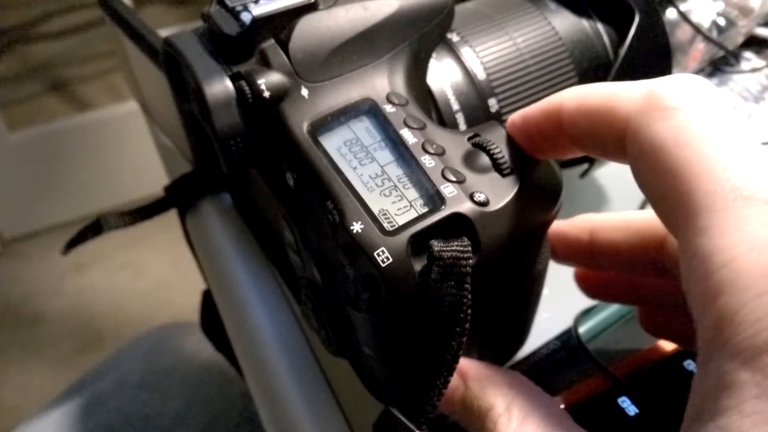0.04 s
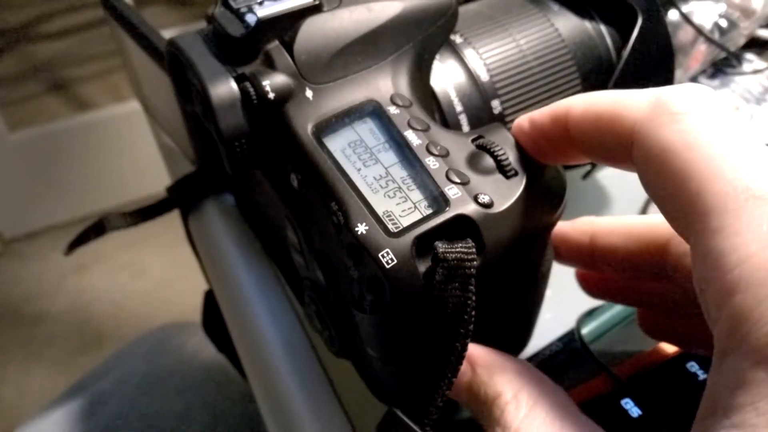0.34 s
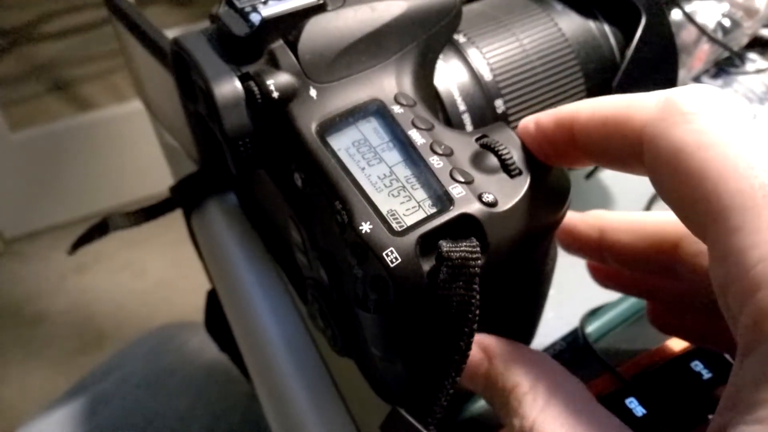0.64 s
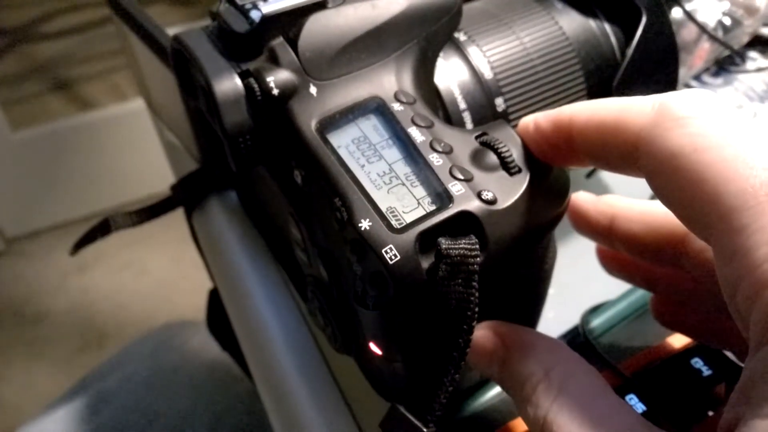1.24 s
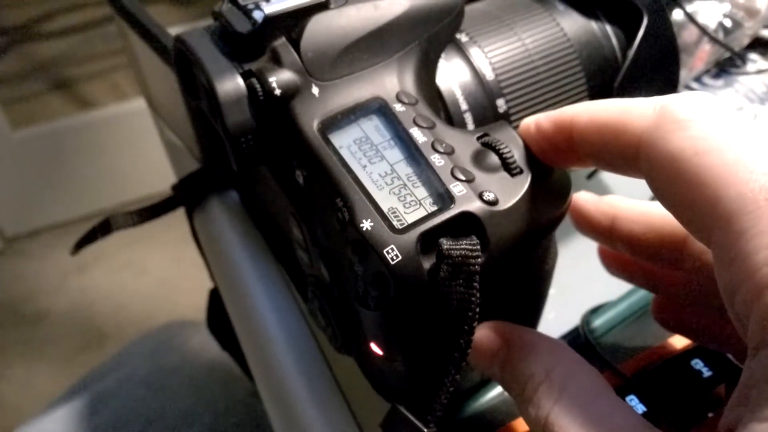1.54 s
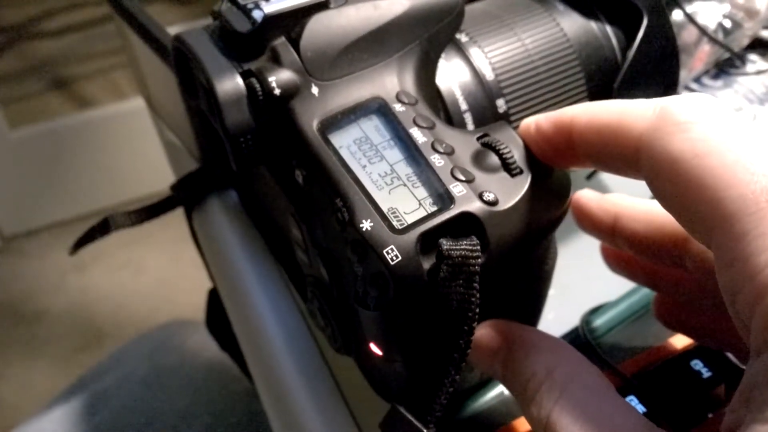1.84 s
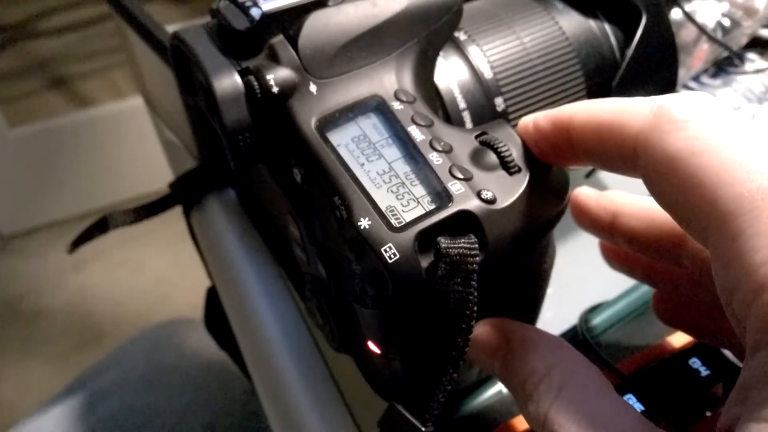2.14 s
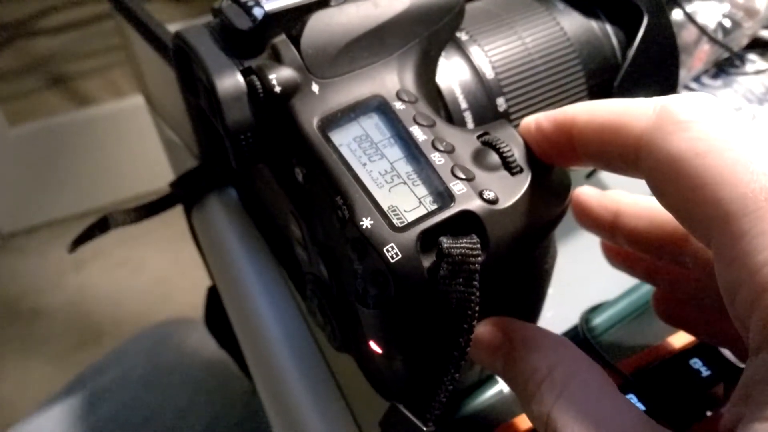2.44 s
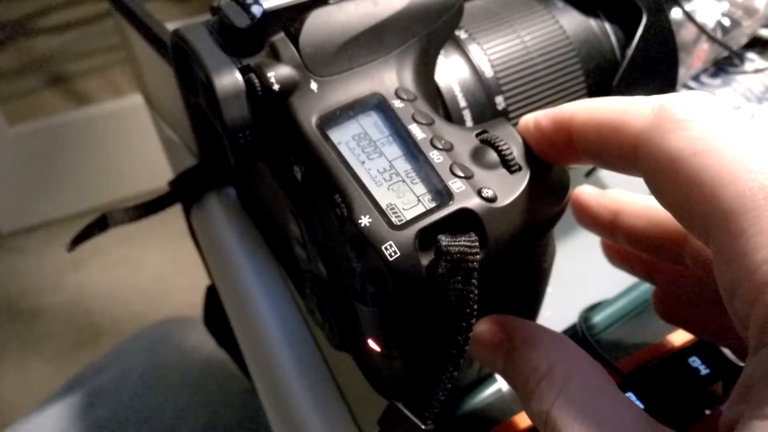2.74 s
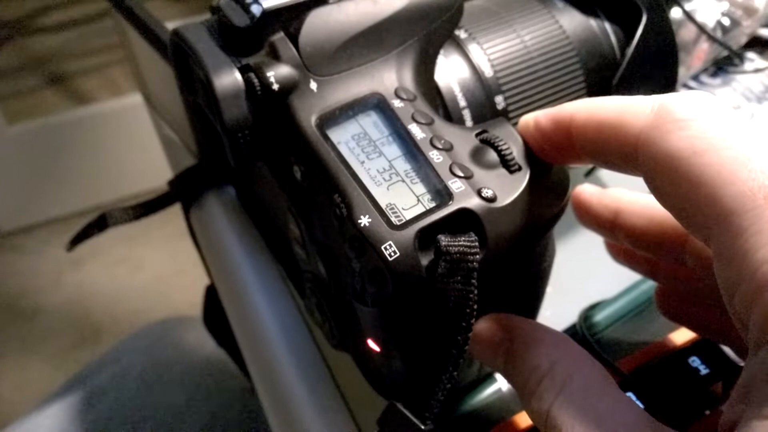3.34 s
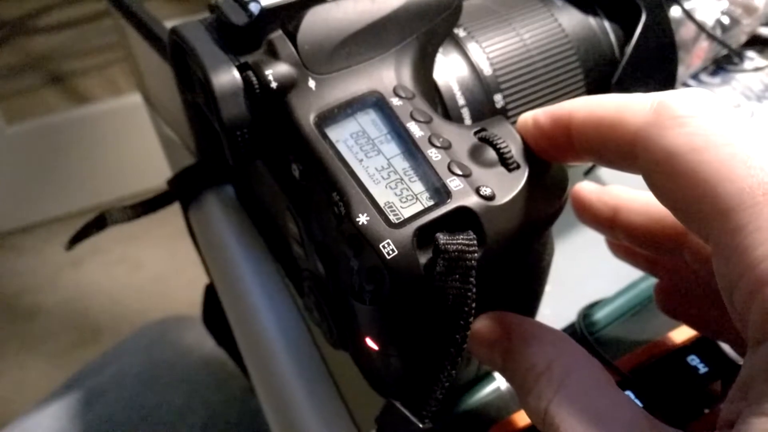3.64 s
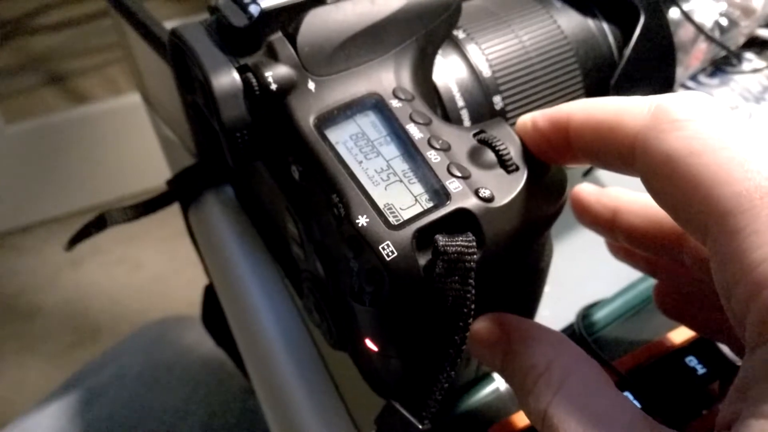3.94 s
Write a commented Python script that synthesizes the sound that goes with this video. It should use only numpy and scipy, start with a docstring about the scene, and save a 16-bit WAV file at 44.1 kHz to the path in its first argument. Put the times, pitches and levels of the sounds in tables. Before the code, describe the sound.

A camera shutter fires close by in a quiet room. After a soft button tick, crisp double clacks repeat about five times a second, each with a brief motor whirr and gear rattle, over a faint low hum.

```python
"""A quiet room, close to a reflex camera on a stand: a soft button tick, then a burst of seventeen frames.
In each frame the release ticks, the mirror slaps up, the shutter closes and the mirror seats:
four chattering blows that ring the camera body. The motor whirrs and its gear teeth rattle as it winds on.
Underneath, the body thuds with the recoil and the shaken stand hums low."""
import sys
import numpy as np
from scipy import signal
from scipy.fft import rfft, irfft
from scipy.io import wavfile
from scipy.ndimage import uniform_filter1d

SR = 44100
rng = np.random.default_rng(int(sys.argv[2]) if len(sys.argv) > 2 else 0)


def inscribe(sig):
    """Save sig as 16-bit PCM at rate SR to the path in sys.argv[1].

    A 1-D sig is mono; a 2-D sig holds one channel per row.
    Samples are clipped to [-1, 1] before scaling.
    """
    pcm = np.round(np.clip(np.atleast_2d(sig).T, -1, 1) * 32767)
    wavfile.write(sys.argv[1], SR, pcm.astype(np.int16))


N = 176400

# the frames of the burst: slap_s, release_tick_db
FRAMES = [(0.8185, -3.2), (1.006, 0.4), (1.1949, 0), (1.3838, 0.1), (1.5727, -0.2), (1.762, -0.1),
          (1.9504, 0.2), (2.1392, 0.6), (2.3282, -1), (2.5169, 0.9), (2.7057, 0.2), (2.8947, -0.7),
          (3.0835, 0.3), (3.2724, 1), (3.4378, -0.1), (3.6273, 0), (3.8157, -0.6)]
# how long the room rings: frequency_hz, t60_s
ROOM_DECAY = [(150, .36), (800, .36), (2500, .33), (6000, .33), (14000, .33)]
LEAD_S = .005  # space for a blow to rise before it lands


def amp(db):
    """Decibels to gain."""
    return 10 ** (np.asarray(db) / 20)


def unit(x):
    """Scales to rms 1."""
    return x / np.sqrt(np.mean(x ** 2) + 1e-20)


def curve_at(points, hz):
    """Reads a curve on a log-frequency axis."""
    point_hz, value = np.transpose(points)
    return np.interp(np.log(hz + 1), np.log(point_hz + 1), value)


def add(mix, start_s, sound):
    """Mixes a stereo sound in at a time."""
    span = mix[:, round(start_s * SR):][:, :sound.shape[1]]
    span += sound[:, :span.shape[1]]


def pan(db):
    """Left and right gains for a left-minus-right level."""
    return amp(np.array([[.5], [-.5]]) * db)


def stereo_image(x, colour=None):
    """Blends two unrelated signals into narrow bass and wide treble, with optional EQ; rms 1."""
    # likeness of left and right: frequency_hz, correlation
    likeness = [(100, .85), (700, .85), (1500, .8), (2800, .55), (5000, .28), (12000, .12)]
    hz, spectra = np.fft.rfftfreq(x.shape[1], 1 / SR), rfft(x)
    correlation = curve_at(likeness, hz)
    mid, side = spectra[0] * np.sqrt(1 + correlation), spectra[1] * np.sqrt(1 - correlation)
    eq = 1 if colour is None else amp(curve_at(colour, hz))
    return unit(irfft(np.array([mid + side, mid - side]) * eq, x.shape[1]))


def noise(size, colour=None):
    """Stereo noise of rms 1."""
    return stereo_image(rng.standard_normal((2, size)), colour)


def reflections(t60, size):
    """A diffuse tail, each band dying at its own speed; energy 1."""
    hz, t, bands = signal.stft(noise(size), SR, nperseg=256)
    decay = amp(-60 * t / curve_at(t60, hz)[:, None])
    tail = signal.istft(bands * decay, SR, nperseg=256)[1]
    tail *= np.clip(np.arange(tail.shape[1]) / SR / .002 - 1, 0, 1)  # fades in from 2 to 4 ms
    return unit(tail) / np.sqrt(tail.shape[1])


def blend(tails):
    """A random mixture of reflection tails, energy about 1."""
    weights = unit(rng.standard_normal(len(tails)))
    return np.tensordot(weights, tails, 1) / np.sqrt(len(tails))


def room_tone():
    """A faint, steady bed of mostly low noise."""
    # colour of the quiet room: frequency_hz, level_db
    colour = [(12, -15), (22, -2), (60, 0), (86, -9), (120, -6), (150, -11), (210, -7), (290, -22),
              (400, -18), (600, -27), (1000, -32), (1700, -35), (2150, -30), (2700, -35), (4300, -38),
              (6200, -42), (8000, -46), (16000, -53)]
    return amp(-58) * noise(N, colour)


def stand_hum(drift_hz=1.3):
    """Two low, slightly wavering modes of the stand ring on through the burst, over a loose rumble."""
    # swell of the lower mode: time_s, level_db
    sway = [(0.7, -70), (0.74, -62), (2.24, -48), (2.3, -62), (2.38, -41), (2.45, -53), (2.8, -43),
            (3.1, -57), (3.19, -42), (3.29, -56), (3.39, -48), (3.98, -60), (4.0, -65)]
    # swell of the upper mode: time_s, level_db
    hum = [(0.7, -71), (0.86, -49), (0.9, -56), (1.3, -53), (1.46, -36), (1.82, -49), (2.37, -44),
           (2.42, -53), (2.62, -43), (2.68, -50), (2.75, -41), (3.05, -54), (3.19, -42), (3.25, -49),
           (3.48, -45), (3.51, -52), (3.93, -45), (4.0, -48)]
    # loose shaking of the stand: frequency_hz, level_db
    rumble = [(20, -7), (55, -2), (90, -2), (130, -2), (200, -10), (300, -28), (1000, -60)]
    t, modes = np.arange(N) / SR, 0
    for swell, pitch_hz, trim_db in ((sway, 54, -1.5), (hum, 119.5, -1)):
        level = amp(trim_db + np.interp(t, *np.transpose(swell)))
        drift = unit(uniform_filter1d(rng.standard_normal(N), size=5000))
        phase = 2 * np.pi * np.cumsum(pitch_hz + drift_hz * drift) / SR
        modes += level * np.sqrt(2) * np.sin(phase)
    fade_in = np.clip((t - FRAMES[0][0]) / .02, 0, 1)
    return pan(-3.5) * (modes + amp(-54) * noise(N, rumble)) * fade_in


def button_tick(start_s=.459, rise_s=.001, decay_s=.004, size=4096):
    """A soft tick as the finger takes up the release button."""
    # colour of the tick: frequency_hz, level_db
    colour = [(100, -15), (400, -12), (800, 0), (2000, 0), (3000, -9), (6000, -18), (9000, -31),
              (14000, -42)]
    out, t = np.zeros((2, N)), np.arange(size) / SR
    tick = noise(size, colour) * np.minimum(t / rise_s, 1) * np.exp(-t / decay_s)
    add(out, start_s, amp(-31) * unit(tick) / np.sqrt(size))
    return out


def recoil(peak_s=.052, half_length_s=.06, size=8192):
    """The moving mirror and gears shake the body with much the same thud in each frame."""
    # colour of the thud: frequency_hz, level_db
    colour = [(25, -8), (40, -11), (60, -8), (85, -1), (120, -5), (150, -3), (180, -8), (207, 4), (235, -6),
              (290, -17), (380, -16), (600, -34)]
    out, usual = np.zeros((2, N)), noise(size, colour)
    t = np.arange(size) / SR - .015  # time after the slap
    envelope = np.exp(-((t - peak_s) / half_length_s) ** 4)
    for slap_s, _ in FRAMES:
        add(out, slap_s + t[0], envelope * unit(usual + .9 * noise(size, colour)))
    return amp(-41.5) * pan(-2.5) * out


def body_ring(part, size=4096):
    """How one part of the camera rings through the case when struck; energy 1."""
    # broad tone, by part: frequency_hz, level_db
    colour = {"release": [(60, -16), (200, -10.3), (400, -18.3), (700, -8.1), (1200, -6.4), (2500, 0.0),
              (4500, -4.1), (7000, -6.6), (11000, -4.6), (15500, -14.1)], "slap": [(60, -13), (200, -7.5),
              (400, -11.3), (700, -8.8), (1200, -3.8), (2500, -5.9), (4500, -5.1), (7000, 0.0),
              (11000, -9.5), (15500, -8.1)], "shutter": [(60, -17), (200, -10.7), (400, -20.3),
              (700, -18.9), (1200, -9.6), (2500, 0.0), (4500, -9.3), (7000, -8.7), (11000, -9.0),
              (15500, -15.2)], "seat": [(60, -9), (200, -2.8), (400, -12.6), (700, -5.2), (1200, -7.6),
              (2500, 0.0), (4500, -6.4), (7000, -3.3), (11000, -4.3), (15500, -7.4)], "motor": [(60, -6),
              (200, 0.0), (400, -9.9), (700, -12.4), (1200, -5.0), (2500, -1.0), (4500, -6.8), (7000, -9.5),
              (11000, -11.0), (15500, -16.2)]}
    # resonances, by part: pitch_hz, width_hz, height_db
    part_modes = {"release": [(1479, 272, 8.7), (2197, 60, 5.2), (3248, 60, 1.0), (3924, 499, 8.6),
                  (5726, 622, 11.7), (6140, 221, 6.8), (7019, 662, 7.7), (8637, 472, 9.7)],
                  "slap": [(749, 227, 12.1), (1582, 326, 12.8), (2188, 374, 8.0), (2542, 315, 16.0),
                  (2822, 386, 11.2), (3414, 465, 9.8), (3997, 295, 12.2), (5286, 105, 6.2),
                  (6335, 661, 5.6), (7807, 94, 7.2), (8699, 305, 7.5), (10615, 938, 8.2),
                  (12118, 1081, 7.9), (13850, 218, 8.4)], "shutter": [(389, 94, 16.0), (561, 145, 12.9),
                  (796, 271, 16.0), (1566, 145, 9.4), (2189, 83, 4.8), (3011, 312, 11.0), (5446, 379, 6.9),
                  (6278, 678, 6.0), (7395, 134, 5.9), (8160, 421, 8.6), (9083, 849, 7.7),
                  (12129, 1060, 5.8), (14291, 860, 8.7)], "seat": [(1575, 186, 6.3), (2534, 60, 1.0),
                  (5892, 530, 3.5), (11994, 537, 8.3)], "motor": [(480, 119, 11.1), (787, 275, 9.6),
                  (1545, 60, 4.5), (2304, 388, 5.3), (3172, 433, 4.0), (11932, 1039, 4.0)]}
    # longer rings of the case, under every part: pitch_hz, width_hz, height_db
    case_modes = [(684, 26, 7), (1468, 40, 3.5), (1541, 30, 3), (3950, 200, 2.5), (5718, 80, 3)]
    # a small body radiates little bass: frequency_hz, gain_db
    bass_loss = [(30, -14), (100, -7), (290, -3), (400, -1), (500, -2.5), (650, 0)]
    # stereo placement, by part: frequency_hz, left_minus_right_db
    placement = {"release": [(300, -1.4), (670, 4.0), (1414, 5.1), (2569, 0.3), (4062, -1.5), (6324, -3.7),
                 (11135, -3.8)], "slap": [(300, -0.2), (670, 3.6), (1414, -1.2), (2569, 3.4), (4062, -3.8),
                 (6324, -1.7), (11135, -3.0)], "shutter": [(300, -2.6), (670, 4.7), (1414, 3.8),
                 (2569, -1.3), (4062, -2.1), (6324, 0.9), (11135, 0.1)], "seat": [(600, 3), (2500, 0),
                 (12000, -2)], "motor": [(200, -2), (600, 4), (2500, 0), (12000, -1.5)]}
    hz = abs(np.fft.fftfreq(size, 1 / SR))
    peaks_db = sum(height_db / (1 + (2 * (hz - pitch_hz) / width_hz) ** 2)
                   for pitch_hz, width_hz, height_db in part_modes[part] + case_modes)
    tone_db = curve_at(colour[part], hz) + curve_at(bass_loss, hz) + peaks_db
    log_gain = np.log(amp(tone_db) * pan(curve_at(placement[part], hz)))
    spectrum = np.exp(np.conj(signal.hilbert(log_gain)))  # minimum phase: the ring follows the hit
    ring = np.fft.ifft(spectrum).real[:, :size // 2]
    return unit(ring) / np.sqrt(size // 2)


def each_frame(envelope):
    """Repeats an envelope, given against the time after the slap, for every frame."""
    t = np.arange(N) / SR
    return sum(envelope(t - slap_s) for slap_s, _ in FRAMES)


def motor_wind(teeth_per_s=4000, spread_db=2.5, hiss=.55, whirr_hz=2400, whirr_width_hz=1000):
    """Gear teeth rattle as the shutter is cocked again, over the whirr of the motor."""
    # effort of the gear train through one cycle: after_slap_s, level_db
    wind = [(-.015, -62), (-.0125, -39), (-.004, -39), (.016, -45), (.023, -36), (.034, -46), (.039, -35),
            (.05, -39), (.062, -35), (.0675, -26.5), (.072, -32), (.085, -28.5), (.092, -33), (.098, -28),
            (.106, -34), (.127, -39), (.139, -56)]
    teeth = rng.random(N) < teeth_per_s / SR
    strength = amp(spread_db * np.minimum(rng.exponential(1, N), 3))
    clicks = unit(teeth * strength * rng.standard_normal((2, N)))
    rattle = stereo_image(clicks + hiss * rng.standard_normal((2, N)))
    after_slap_s, level_db = np.transpose(wind)
    effort = each_frame(lambda t: np.interp(t, after_slap_s, amp(level_db), left=0, right=0))
    gears = signal.fftconvolve(rattle * effort, body_ring("motor"), axes=1)[:, :N]
    hz = np.fft.rfftfreq(N, 1 / SR)
    band = 1 / (1 + (2 * (hz - whirr_hz) / whirr_width_hz) ** 2)
    whirr = unit(irfft(rfft(noise(N)) * band, N))
    spin = each_frame(lambda t: np.exp(-((t - .108) / .022) ** 2))  # spins up, then coasts
    direct = gears + amp(-42) * whirr * spin
    room = signal.fftconvolve(direct, reflections(ROOM_DECAY, size=16384), axes=1)[:, :N]
    return direct + amp(-10) * room


def contact(rise_s, decay_s, chatter_s=.0012, size=1024, passes=6):
    """Two parts slide together, chatter briefly and come to rest; near-even spectrum, energy 1."""
    t = np.arange(size) / SR - LEAD_S
    envelope = np.exp(np.minimum(t, 0) / rise_s - np.maximum(t - chatter_s, 0) / decay_s)
    click = noise(size) * envelope
    for _ in range(passes):  # flatten the spectrum, then restore the envelope
        white = irfft(np.exp(1j * np.angle(rfft(click))))
        local_rms = np.sqrt(abs(uniform_filter1d(white ** 2, size=40)) + 1e-12)
        click = envelope * np.tanh(white / local_rms)
    spectrum = rfft(click)
    click = irfft(spectrum / (abs(spectrum) + 1e-9) ** .7)  # partial whitening
    return unit(click) / np.sqrt(size)


def shutter_blows(room_db=-15, tail_count=8):
    """Release, mirror slap, shutter and mirror seat strike the body, nearly alike in every frame."""
    # the blows, by part: after_slap_s, energy_db, rise_s, decay_s, near_reflections_db, variation (0-1)
    blows = { "release": (-.0125, 4, .00012, .0018, -8.5, .4), "slap": (.0002, 11, .0005, .001, -13, .2),
             "shutter": (.0423, 9.3, .0003, .0017, -12.5, .35), "seat": (.0756, 2.4, .002, .0014, -8.5, .5),
             }
    # how long the near reflections last: frequency_hz, t60_s
    near_decay = [(200, .07), (2500, .06), (12000, .045)]
    out = np.zeros((2, N))
    room_tails = np.array([reflections(ROOM_DECAY, size=12288) for _ in range(tail_count)])
    near_tails = np.array([reflections(near_decay, size=4096) for _ in range(tail_count)])
    for part, (after_slap_s, energy_db, rise_s, decay_s, near_db, variation) in blows.items():
        click, near, room = contact(rise_s, decay_s), blend(near_tails), blend(room_tails)
        same = np.sqrt(1 - variation ** 2)  # weight of what repeats from frame to frame
        hits = np.zeros((2, N))
        for slap_s, release_tick_db in FRAMES:
            hit = np.zeros_like(room)
            add(hit, LEAD_S, amp(room_db) * (same * room + variation * blend(room_tails)))
            add(hit, LEAD_S, amp(near_db) * (same * near + variation * blend(near_tails)))
            add(hit, 0, same * click + variation * contact(rise_s, decay_s, passes=1))
            accent_db = release_tick_db if part == "release" else 0
            add(hits, slap_s + after_slap_s - LEAD_S, amp(energy_db + accent_db) * hit)
        out += signal.oaconvolve(hits, body_ring(part), axes=1)[:, :N]
    return out


def scene():
    """The camera and its stand over the quiet of the room."""
    return shutter_blows() + motor_wind() + recoil() + stand_hum() + button_tick() + room_tone()


def record(dry, ceiling=.88, cutoff_hz=15850):
    """Soft clipping rounds off the highest peaks, then a steep low-pass trims the top."""
    rounded = dry / (1 + abs(dry / ceiling) ** 4) ** (1 / 4)
    low_pass = signal.firwin(255, cutoff_hz, window=("kaiser", 8), fs=SR)
    return signal.oaconvolve(rounded, low_pass[None], "same", axes=1)


dry = scene()
out = record(dry)
inscribe(out)
```